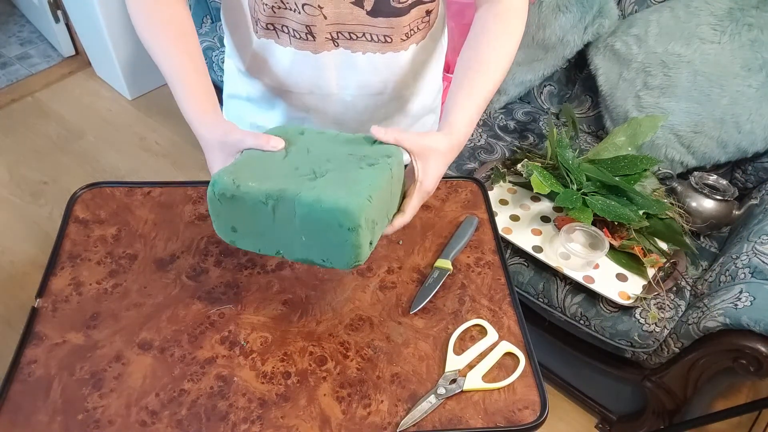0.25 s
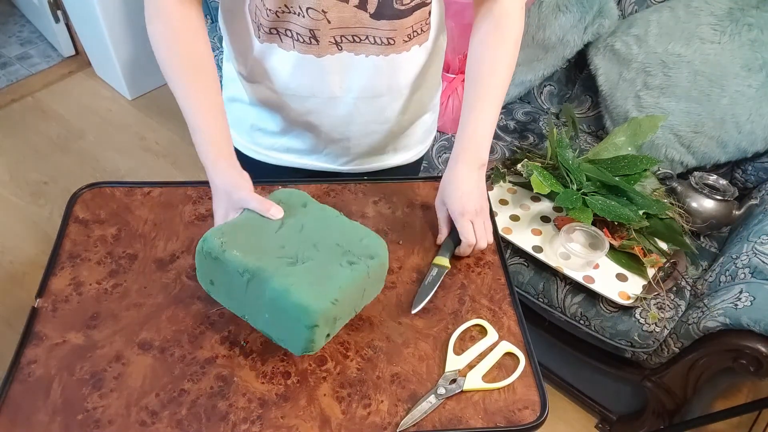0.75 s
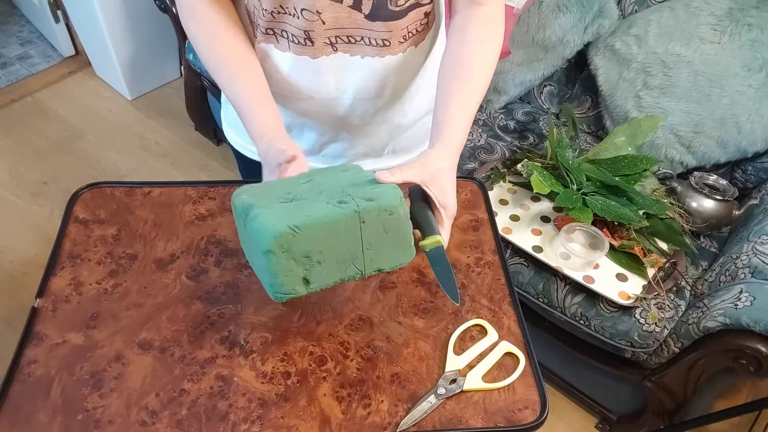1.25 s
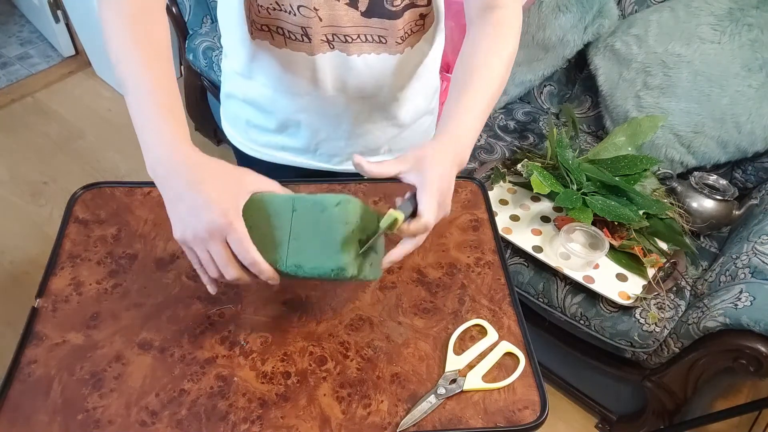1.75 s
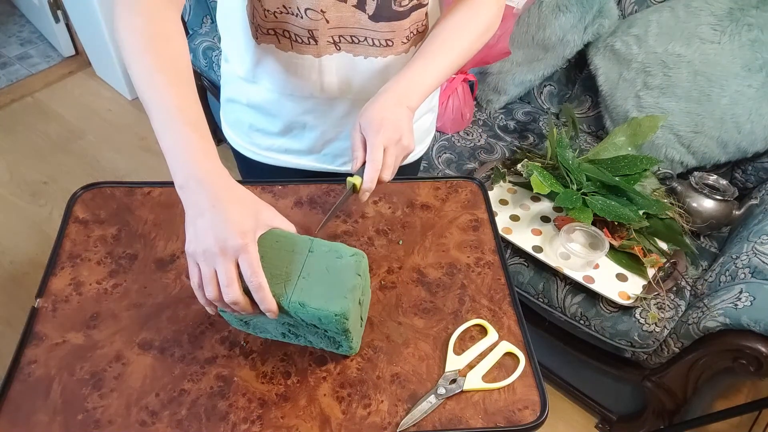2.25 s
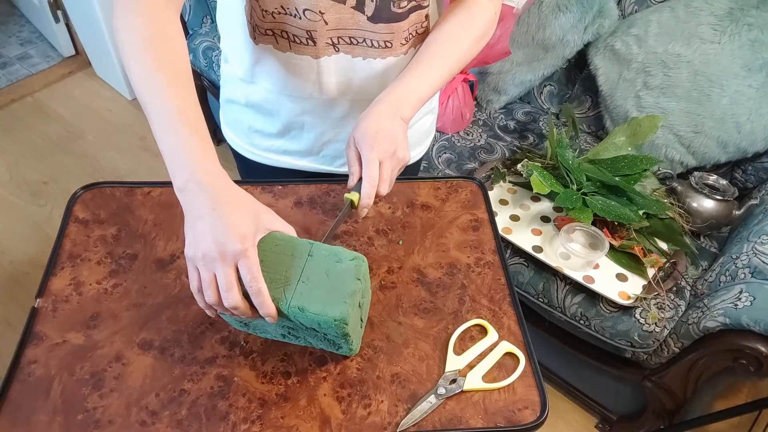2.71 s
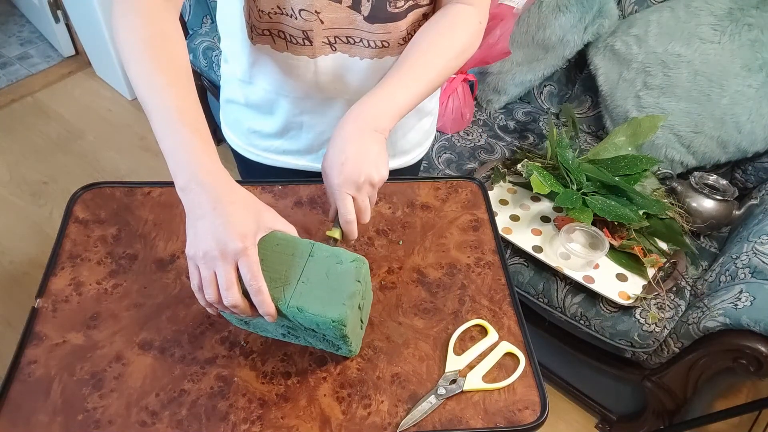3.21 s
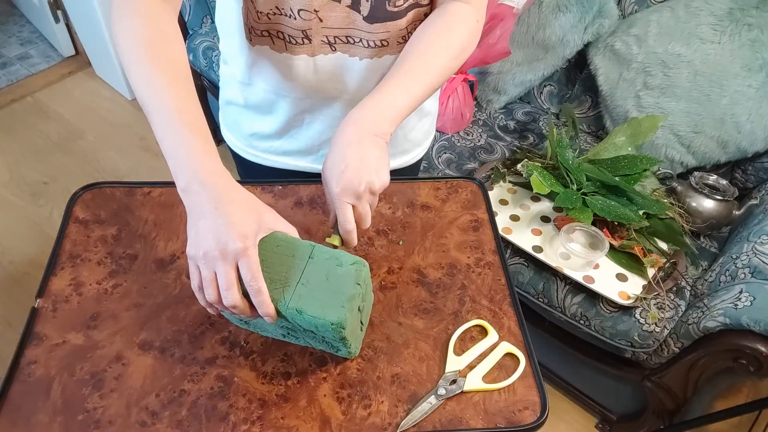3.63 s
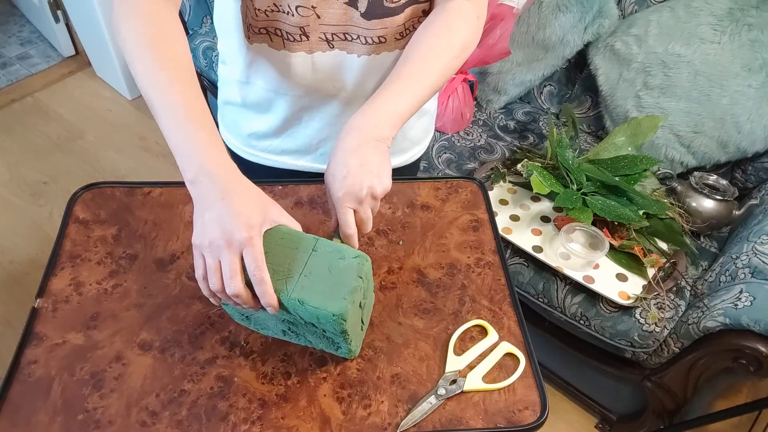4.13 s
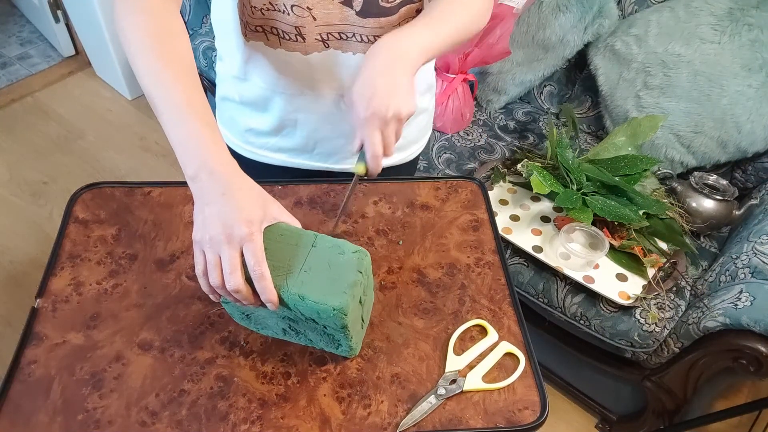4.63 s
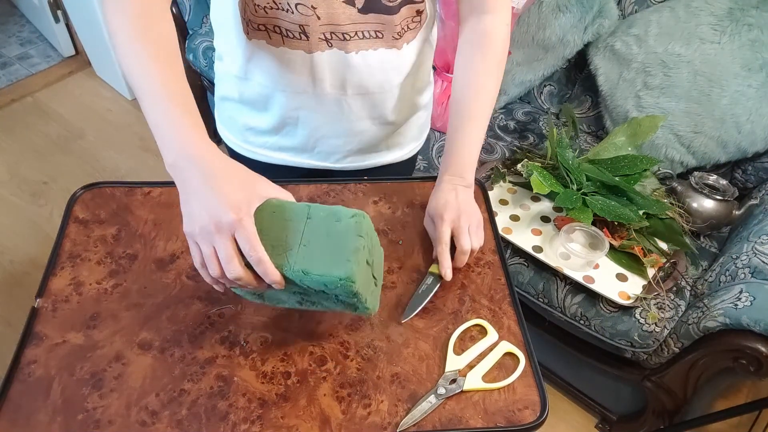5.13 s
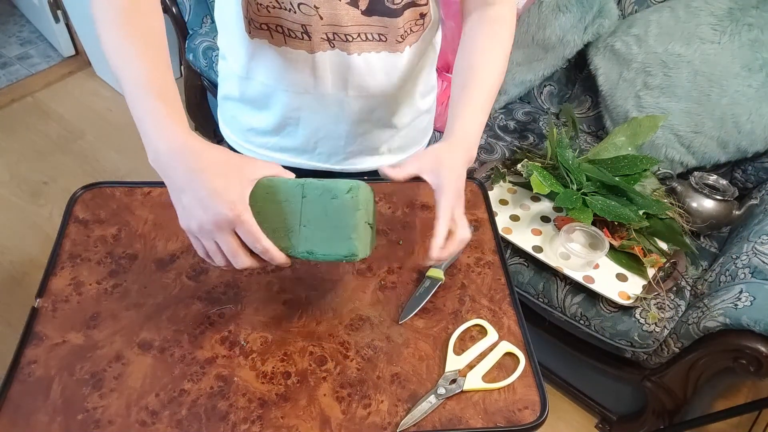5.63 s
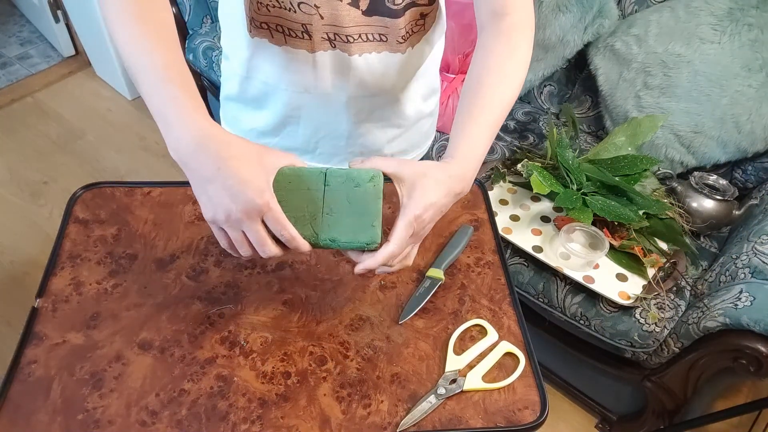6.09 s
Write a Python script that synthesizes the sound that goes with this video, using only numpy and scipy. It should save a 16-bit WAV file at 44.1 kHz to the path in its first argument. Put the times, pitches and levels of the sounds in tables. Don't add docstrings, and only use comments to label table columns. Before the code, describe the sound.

Close, crumbly foam rasping under a blade, a hard wooden knock, the knife laid down with a clack, and a final sharp crack.

```python
import sys
import numpy as np
from scipy import signal
from scipy.fft import rfft, irfft, next_fast_len
from scipy.io import wavfile
from scipy.ndimage import uniform_filter1d, map_coordinates

SR = 44100
rng = np.random.default_rng(int(sys.argv[2]) if len(sys.argv) > 2 else 0)


def generate_wav(sig):
    pcm = np.round(np.clip(np.atleast_2d(sig).T, -1, 1) * 32767).astype(np.int16)
    wavfile.write(sys.argv[1], SR, pcm)


def boost_factor(decibels):
    exponent = np.asarray(decibels, float) / 20
    return 10 ** exponent


N = 280476

# (start [s], rise [s], length [s], peak [dB], brightness [dB])
FOAM_GRIPS = [(0.06, 0.0085, 0.4, -61.5, -5.5), (0.247, 0.049, 0.096, -63.5, -6.5),
              (0.566, 0.03, 0.058, -60, -8), (0.697, 0.013, 0.046, -58.5, -22),
              (0.87, .015, 0.063, -66.5, -5), (0.913, 0.0079, 0.061, -69, -1.5),
              (0.989, 0.028, 0.12, -70.5, -0.5), (1.164, 0.0043, .009, -51, 5),
              (1.166, 0.0045, 0.1, -60.5, -12), (1.193, 0.086, 0.18, -59, -7),
              (1.676, 0.032, 0.28, -59.5, -3.5), (1.715, 0.022, .07, -57, -13),
              (2.132, 0.022, 0.19, -67.5, -7), (2.563, 0.051, 0.089, -54.5, -11.5),
              (4.413, 0.092, 0.31, -52.5, -2), (4.608, 0.018, 0.12, -58.5, -6),
              (4.792, 0.14, 0.28, -74.5, -2), (5.838, 0.0047, 0.17, -61, -0.5), (5.948, 0.12, .12, -70, 2)]
# (time [s], force [dB], brightness [dB])
FIRST_DRAW = [(2.62, -54, -11), (2.672, -62.5, -11), (2.726, -55, -17.5), (2.864, -47, -6.5),
              (3.066, -48, -1), (3.104, -50.5, -1.5), (3.176, -46, -2.5), (3.316, -50.5, -13.5),
              (3.39, -62, -2)]
# (start [s], length [s], force [dB], change over the push [dB], brightness [dB])
SAW_PUSHES = [
    (3.397, 0.094, -45.5, 4.5, -10),
    (3.528, .31, -41.5, -6, -9),
    (3.888, .13, -36.5, -18.5, -9.5),
    (4.116, 0.13, -50.5, 12, -9.5),
]
# (start [s], rise [s], length [s], peak [dB], upper tone [dB])
TABLE_DRAGS = [
    (0.578, 0.03, .09, -45, -6),
    (0.66, 0.027, 0.058, -56.5, 10.5),
    (0.695, 0.011, 0.096, -47, -3.5),
    (0.761, 0.026, 0.095, -58, -12),
    (3.279, .025, 0.077, -50, -13),
    (5.239, 0.016, 0.082, -62, -15),
    (5.331, .015, .05, -59, -26),
    (5.384, 0.017, .03, -55, -12),
    (5.838, .015, 0.091, -63, -11),
    (6.112, .01, 0.11, -54.5, -19),
]
# (time [s], peak [dB], brightness [dB], low end [dB])
FOAM_SNAPS = [(0.0745, -50, 5, -3), (0.5695, -56, 5.5, -4), (1.1675, -57.5, -8, 2), (3.4027, -41, 14, 14),
              (3.8891, -53, -7, 6), (3.897, -46, -13, -7), (4.0685, -50.5, -19.5, 7),
              (4.0985, -45, -3, 15.5), (4.1127, -48.5, 9, 14), (4.8235, -61, 2, -3), (5.8386, -63, -2, -11),
              (6.0395, -64, 6, -7), (6.0612, -38.5, 8, -8), (6.1107, -30, 4.5, -13), (6.1275, -36.5, 1, -5),
              (6.136, -32, 7, -11), (6.1545, -18.5, 2.5, -0.5)]
# (time [s], peak [dB], brightness [dB], thud [dB])
BLADE_KNOCKS = [
    (4.1855, -15.5, 1, -1),
    (4.204, -32, -1, 8.5),
    (4.299, -38.5, 1, -9.5),
    (4.454, -42.5, -17.5, 5),
]
# (time [s], peak [dB], brightness [dB], thud [dB])
HANDLE_KNOCKS = [
    (0.571, -49, -16, -8),
    (0.661, -59, -3, 12),
    (4.388, -47.5, 1, -5),
    (4.447, -47, 8, -7),
    (5.407, -29, -2, -11.5),
    (5.426, -43, 9, 11),
]
# (start [s], length [s], pitch [Hz], width [Hz], level [dB])
BLADE_SQUEAKS = [
    (1.71, 0.12, 1160, 100, -62),
    (2.112, 0.062, 1320, 84, -72),
    (2.782, 0.23, 1340, 150, -48),
    (2.999, 0.084, 8000, 300, -51.5),
    (5.068, 0.044, 1384, 40, -69),
    (5.45, 0.087, 354, 30, -70.5),
    (5.65, 0.085, 3070, 80, -74),
    (5.675, 0.059, 3270, 60, -74),
    (5.75, 0.08, 3080, 72, -74),
]
# (time [s], peak [dB], pitch [Hz])
TABLE_THUDS = [
    (0.076, -41, 64.3),
    (1.684, -36, 63.4),
    (4.186, -43, 89),
    (6.154, -45, 174),
]
# (time [s], left over right [dB])
HANDS_PAN = [(0, -1.5), (2.5, 0), (5.301, 0), (5.9, -1), (6.05, -0.5), (6.36, -5)]

# (frequency [Hz], level per Hz [dB])
FOAM_COLOUR = [(120, -39), (200, -7), (306, -17), (361, 7), (503, 6.5), (652, -2.5), (770, -4.5),
               (1020, -1.5), (2130, -4.5), (2800, -7.5), (5870, -16), (8030, -14.5), (8810, -17),
               (15000, -2.5), (16500, -36)]
# (frequency [Hz], level per Hz [dB])
SNAP_COLOUR = [(100, -16.5), (330, 1), (700, -5), (1100, 1.5), (2000, -4), (3200, -4), (5000, -13),
               (7800, -15.5), (9500, -20), (14500, -18.5), (16500, -19)]
# (frequency [Hz], level per Hz [dB])
BLADE_COLOUR = [(35, -76), (60, -17), (149, -15.5), (193, -19.5), (346, -1), (553, -7.5), (1050, 1.5),
                (1600, -5), (3940, -17), (5590, -26), (7940, -29), (10000, -32.5), (14600, -39),
                (16000, -60)]
# (frequency [Hz], level per Hz [dB])
HANDLE_COLOUR = [(35, -49), (60, -5), (156, -26), (222, -1.5), (287, -23), (363, -2.5), (458, -20),
                 (600, -7.5), (785, -17), (1950, -20.5), (4120, -37.5), (13900, -83), (16000, -75)]
# (frequency [Hz], width [Hz], level [dB])
TABLE_MODES = [(240, 68, -24.5), (367, 51, 20), (617, 58, -1.5), (662, 11, 18.5), (820, 810, -35)]
# (frequency [Hz], time to fall 60 dB [s])
ROOM_DECAY = [(200, 0.35), (1000, 0.31), (4000, 0.4), (10000, 0.34), (16000, 0.27)]
# (frequency [Hz], level per Hz [dB])
RUMBLE_COLOUR = [(2.4, -80), (4.0, 1.5), (20, -6.5), (38, -17), (59, -16), (80, -26), (129, -25.5),
                 (189, -34.5), (220, -32.5), (290, -56), (480, -120)]
# (frequency [Hz], level per Hz [dB])
HISS_COLOUR = [(88, -2.5), (150, -21), (250, -4.5), (479, -11), (767, -16), (830, -17), (1030, -18.5),
               (1160, -19), (1410, -19), (1790, -25), (2050, -26.5), (4690, -31), (10300, -40.5),
               (15000, -23.5), (16500, -86)]
# (frequency [Hz], correlation [-1 to 1])
FLOOR_LIKENESS = [(20, 0.45), (60, 0.51), (130, -0.33), (300, -0.66), (1400, -0.63), (3100, 0.059),
                  (7000, -0.68), (15000, 0.36)]
# (frequency [Hz], phase [radians])
PORT_LEAD = [(150, 0.13), (500, 1.36), (700, 1.08), (1000, 2.12), (2200, 2.03), (3800, 2.32), (5200, 4.6),
             (8000, 2.9), (9600, 2.03), (15000, 10.6)]
# (frequency [Hz], left over right [dB])
PORT_TILT = [(50, 9), (400, 5), (1000, 3.5), (3500, 2.9), (5200, 5), (6200, 8), (7200, 16.5), (8300, 19.5),
             (9000, 2.5), (12000, 6.5), (15000, 5)]
# (frequency [Hz], level relative to its neighbours [dB])
GATE_THRESHOLD = [(2200, -60), (2600, -5), (3600, -4), (4400, -1.8), (5000, -2.2), (5700, -1.7),
                  (7000, -3.4), (8700, -2), (10500, -1.3), (12000, -2.8), (15000, -3.2), (15300, -60)]


def strokes():
    bursts_per_s = 2500
    sizes = boost_factor(3.34 * np.minimum(rng.exponential(size=N), 4))
    sizes = sizes * (rng.random(N) < bursts_per_s / SR)
    grain = (0.47 * unit(sizes) + 1) * rng.standard_normal((2, N))
    shared, apart = patches(grain, patchy_db=2.0)
    apart = filtered(apart, lambda f: 0.33 + 0.76 * above(f, 7400))
    cells = unit(np.array([shared + apart, shared - apart])) * boost_factor(wobble(35))
    foam, drag = motion()

    turns = np.outer([359, 575], np.arange(N) / SR)
    wander = 1.05 * np.array([wobble(40), wobble(60)])
    rings = np.sqrt(2) * np.sin(2 * np.pi * turns + wander)

    part_trims = boost_factor([[2.5], [0.5], [1.5], [-1.5]])
    rasp = played(cells, foam * part_trims, foam_bands() + [resonances(TABLE_MODES)])
    return rasp + np.sum(drag * rings, axis=0)


def motion():
    bite_s, stop_s = 0.0027, 0.036
    deep_table_db, shallow_table_db = 3, -21
    t = np.arange(N) / SR
    foam, drag = np.zeros((4, N)), np.zeros((2, N))

    for s, rise, length, db, bright_db in FOAM_GRIPS:
        foam += swell(s, rise, length) * layers(db, bright_db, table_db=-7)

    for s, rise, length, db, upper_db in TABLE_DRAGS:
        pressure = swell(s, rise, length)
        drag += boost_factor([[db], [db + upper_db]]) * pressure
        foam += pressure * layers(db + upper_db - 11, bright_db=-20.5, table_db=6)

    for s, length, db, change_db, bright_db in SAW_PUSHES:
        on = np.clip((t - s) / bite_s, 0, 1) * np.clip((s + length - t) / stop_s, 0, 1)
        change = boost_factor(change_db * np.clip((t - s) / length, 0, 1))
        table_db = deep_table_db - 2.2 * (bright_db + 11)
        foam += on * change * layers(db, bright_db, table_db)

    s, db, bright_db = np.transpose(FIRST_DRAW)
    on = np.clip(np.minimum(t - s[0], s[-1] - t) / stop_s, 0, 1)
    depth = np.interp(t, [s[0], 3.28], [0, 1]) ** 4.3
    table_db = shallow_table_db + (deep_table_db - shallow_table_db) * depth
    foam += on * layers(np.interp(t, s, db), np.interp(t, s, bright_db), table_db)

    drag[0] += boost_factor(-6) * foam[3]
    return foam, drag


def swell(start, rise, length):
    t = np.arange(N) / SR - start
    build = np.clip(t / rise, 0, 1) ** 0.82
    ease = np.clip((length - t) / (length - rise), 0, 1) ** 1.98
    return build * ease


def layers(db, bright_db, table_db):
    air_db = -8.5 + 0.83 * bright_db
    parts_db = np.array([0 * bright_db, bright_db, air_db, table_db + 0 * bright_db])
    return boost_factor(db + parts_db).reshape(4, -1)


def foam_bands():
    colour = lambda f: boost_factor(along(FOAM_COLOUR, f))
    return [lambda f: colour(f) * above(f, 645) * (1 - above(f, 4970)),
            lambda f: colour(f) * above(f, 3730) * (1 - above(f, 8900)),
            lambda f: colour(f) * above(f, 8400)]


def snaps():
    return boost_factor(9.5) * blows(FOAM_SNAPS, SNAP_COLOUR, bright_hz=6000, low_hz=1290,
                            rattle=0.46, life_s=0.007, sent_db=1.0)


def knocks():
    edge = blows(BLADE_KNOCKS, BLADE_COLOUR, bright_hz=2860, low_hz=350,
                 rattle=0.23, life_s=0.016, sent_db=-4.5)
    handle = blows(HANDLE_KNOCKS, HANDLE_COLOUR, bright_hz=1530, low_hz=350,
                   rattle=0.28, life_s=0.033, sent_db=1.0)
    return boost_factor(8.5) * edge + boost_factor(2.0) * handle


def blows(events, colour, bright_hz, low_hz, rattle, life_s, sent_db):
    out = np.zeros((2, N + SR))
    f = np.fft.rfftfreq(4096, 1 / SR)
    t = np.arange(SR // 10) / SR
    for s, db, bright_db, low_db in events:
        force = rattle * rng.standard_normal(len(t)) * boost_factor(-60 * t / life_s)
        force[0] = 1
        shelves_db = bright_db * above(f, bright_hz) + low_db * (1 - above(f, low_hz))
        pulse = causal(along(colour, f) + shelves_db)
        pulse *= boost_factor(db) / np.abs(pulse).max()
        rattled = signal.fftconvolve(pulse, force)
        start = round(s * SR)
        out[0, start:][:len(rattled)] += rattled
        out[1, start:][:len(pulse)] += boost_factor(sent_db) * pulse * np.linalg.norm(force)
    return out[:, :N]


def squeaks():
    t, out = np.arange(N) / SR, np.zeros(N)
    for s, length, hz, width, db in BLADE_SQUEAKS:
        arch = np.sin(np.pi * np.clip((t - s) / length, 0, 1))
        out += played(rng.standard_normal(N), [boost_factor(db) * arch], [resonances([(hz, width, 0)])])
    return out


def thuds():
    out, t = np.zeros(N + SR), np.arange(SR // 5) / SR
    for s, db, hz in TABLE_THUDS:
        decay = boost_factor(db + 3 - 60 * t / 0.077)
        out[round(s * SR):][:len(t)] += decay * np.sin(2 * np.pi * hz * t)
    return out[:N]


def room(x):
    step, delay = SR // 4, 110
    out = np.zeros((2, N + SR))
    for start in range(0, N, step):
        hz, t, z = signal.stft(rng.standard_normal((2, SR // 2)), SR, nperseg=256)
        decay = boost_factor(-60 * t / along(ROOM_DECAY, hz)[:, None])
        a, b = signal.istft(z * decay, SR, nperseg=256)[1]
        tails = np.array([a + 0.63 * b, a - 0.8 * b])
        tails = tails / np.linalg.norm(tails[0])
        wet = signal.fftconvolve(x[None, start:start + step], tails, axes=1)
        out[:, start + delay:][:, :wet.shape[1]] += wet
    return out[:, :N]


def floor(rubbing):
    busy = boost_factor(-16) * uniform_filter1d(np.abs(rubbing), round(0.26 * SR))
    beds = [(RUMBLE_COLOUR, boost_factor(-42.5), 1.8), (HISS_COLOUR, boost_factor(-57) + busy, 0.6)]
    turn = lambda f: np.arccos(np.clip(along(FLOOR_LIKENESS, f), -1, 1)) / 2
    out = 0
    for colour, gain, unsteady_db in beds:
        shape = lambda f: boost_factor(along(colour, f)) * [np.cos(turn(f)), np.sin(turn(f))]
        mid, side = filtered(rng.standard_normal((2, N)), shape)
        bed = unit(np.array([mid + side, mid - side]))
        out = out + gain * boost_factor(unsteady_db * wobble(4.09)) * bed
    return filtered(out, lambda f: boost_factor(0.69 * along(PORT_TILT, f) * [[0.5], [-0.5]]))


def unit(x):
    return x / np.sqrt(np.mean(x ** 2) + 1e-20)


def along(points, hz):
    f, v = np.transpose(points)
    return np.interp(np.log(hz + 1), np.log(f + 1), v)


def filtered(x, response):
    m = next_fast_len(N + SR // 2)
    return irfft(rfft(x, m) * response(np.fft.rfftfreq(m, 1 / SR)), m)[..., :N]


def above(f, hz):
    return 1 / (1 + (hz / (f + 1)) ** 6)


def resonances(modes):
    def response(f):
        total = 0
        for k, (hz, width, db) in enumerate(modes):
            damping = 1j * f * width
            total = total + (-1) ** k * boost_factor(db) * damping / (hz * hz - f * f + damping)
        return total
    return response


def played(source, gains, responses):
    grid = np.linspace(0, SR / 2, 4096)
    out = 0
    for gain, response in zip(gains, responses):
        strength = np.sqrt(np.mean(np.abs(response(grid)) ** 2))
        out = out + filtered(source * gain, response) / strength
    return out


def wobble(rate):
    knots = rng.standard_normal(int(N * rate / SR) + 4)
    return map_coordinates(knots, [np.arange(N) * rate / SR])


def patches(x, patchy_db):
    z = signal.stft(x, nperseg=256)[2]
    field = uniform_filter1d(rng.standard_normal(z.shape[1:]), 5, 0)
    field = uniform_filter1d(field, 12, 1)
    return signal.istft(z * boost_factor(patchy_db * unit(field)), nperseg=256)[1][:, :N]


def causal(db):
    cepstrum = irfft(np.log(boost_factor(db)))
    cepstrum[1:len(db) - 1] *= 2
    cepstrum[len(db):] = 0
    return irfft(np.exp(rfft(cepstrum)))


def gate(x):
    cross = np.array([[1, 0.89], [1, -1.176]]) / np.sqrt(2)
    hz, _, z = signal.stft(cross @ x, SR, nperseg=1024, noverlap=768)
    power = uniform_filter1d(np.abs(z) ** 2, 8, 2)
    near, wide = uniform_filter1d(power, 5, 1), uniform_filter1d(power, 35, 1)
    treble = np.sum(np.abs(z[:, hz > 2000]) ** 2, axis=(0, 1))
    calm = treble < 1.6 * uniform_filter1d(treble, 12)
    shut = calm & (near < wide * boost_factor(2 * along(GATE_THRESHOLD, hz))[:, None])
    gated = signal.istft(z * np.where(shut, 0.03, 1), SR, nperseg=1024, noverlap=768)[1]
    return cross @ gated[:, :N]


def scene():
    halves = np.array([[0.5], [-0.5]])
    rubbing = strokes() + squeaks()
    hits, sent = snaps() + knocks()
    top = lambda f: boost_factor(-25 / (1 + np.exp((15700 - f) / 60)))
    lasting = boost_factor(3.0) * rubbing + room(boost_factor(-2.0) * rubbing[0] + boost_factor(3.0) * sent)
    straight = filtered(hits, lambda f: boost_factor(5 * above(f, 2000)))
    air = filtered(lasting, top) + straight + thuds()
    air = air * boost_factor(np.interp(np.arange(N) / SR, *np.transpose(HANDS_PAN)) * halves)
    ports = lambda f: boost_factor(along(PORT_TILT, f) * halves) * np.exp(1j * along(PORT_LEAD, f) * halves)
    return filtered(air, ports) + filtered(floor(rubbing[0]), top)


def low_pass(x):
    return signal.sosfilt(signal.butter(12, 16810, fs=SR, output="sos"), x)


def record(dry):
    rounded = dry / (1 + np.abs(dry / 0.62) ** 4) ** (1 / 4)
    return low_pass(gate(rounded))


dry = scene()
out = record(dry)
generate_wav(out)
```